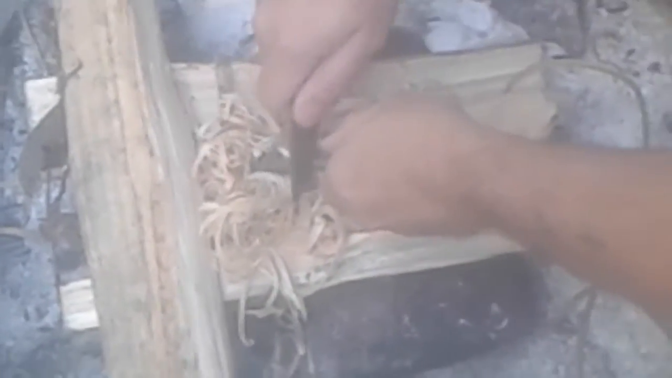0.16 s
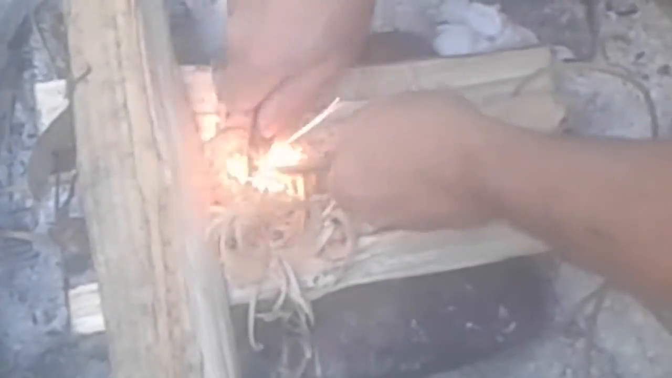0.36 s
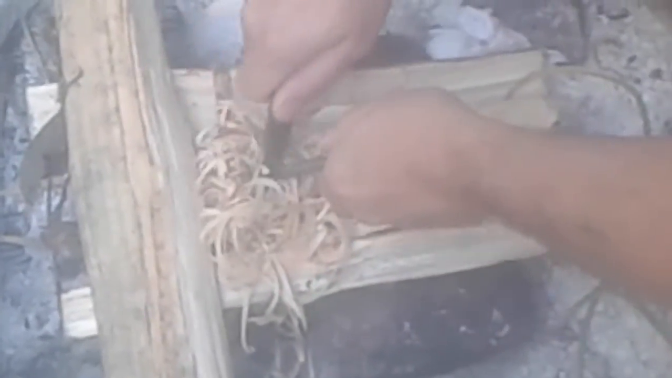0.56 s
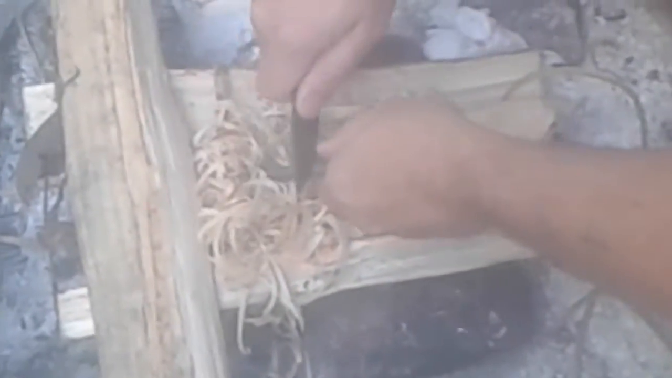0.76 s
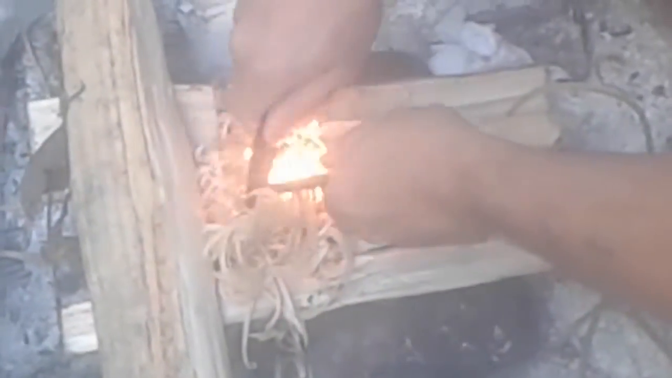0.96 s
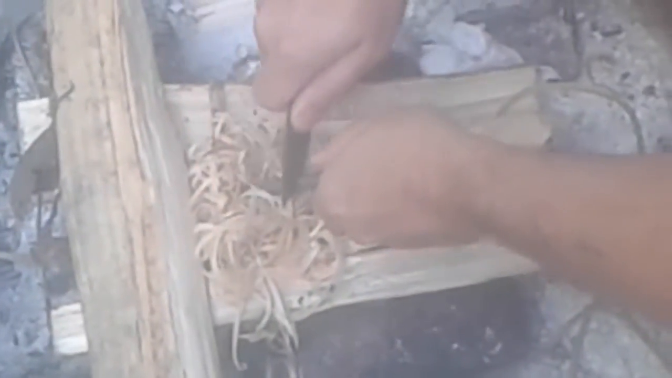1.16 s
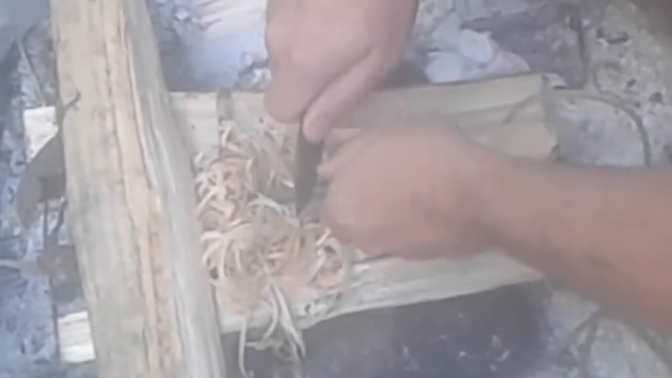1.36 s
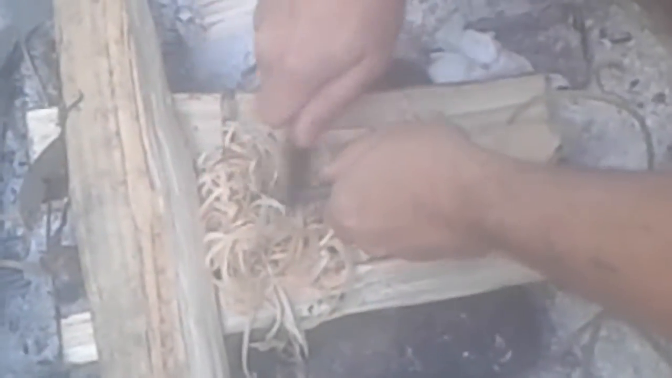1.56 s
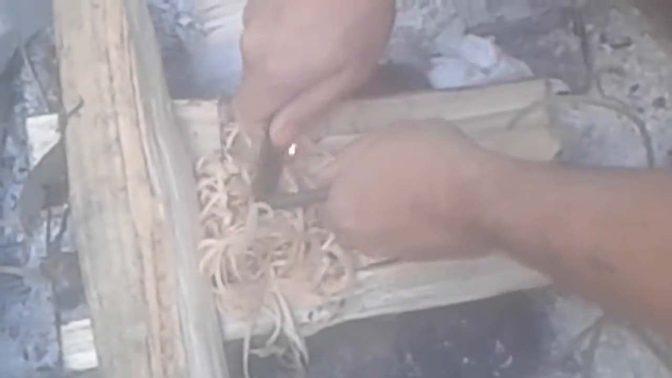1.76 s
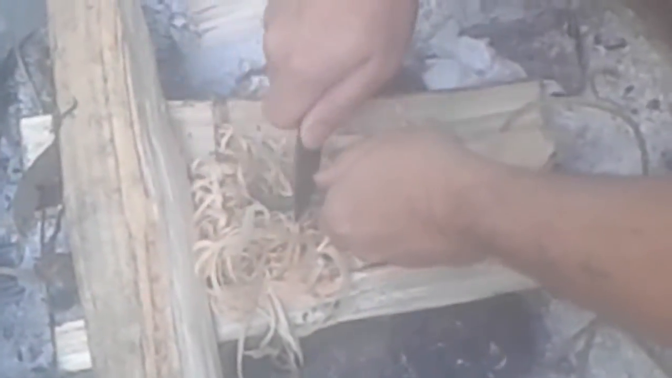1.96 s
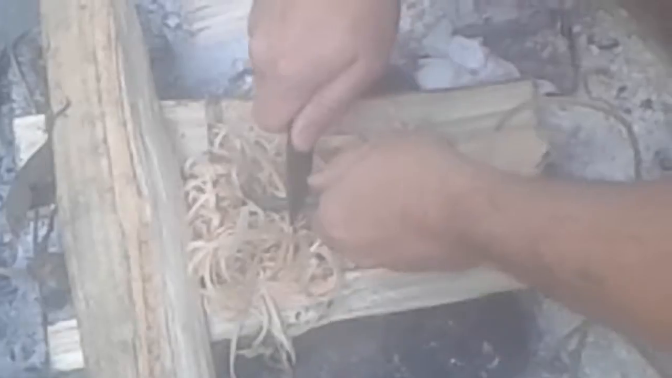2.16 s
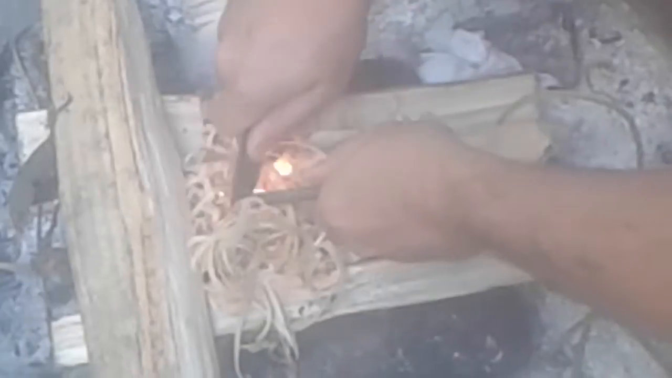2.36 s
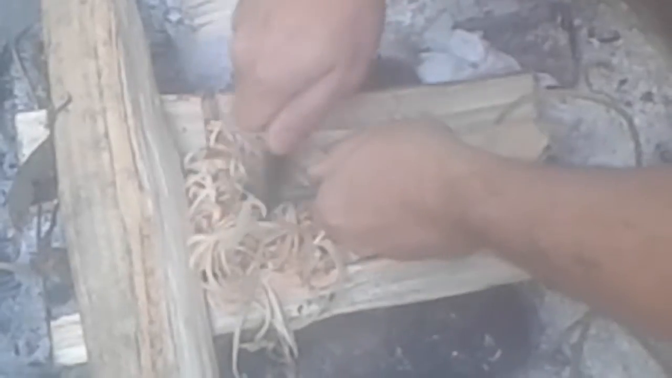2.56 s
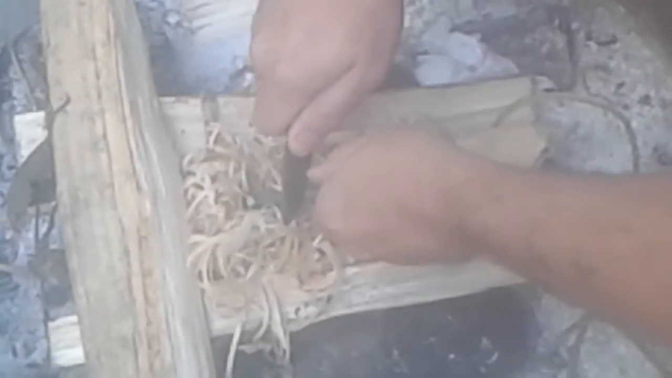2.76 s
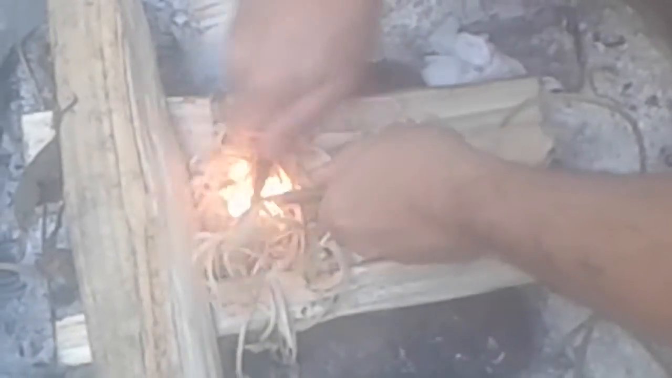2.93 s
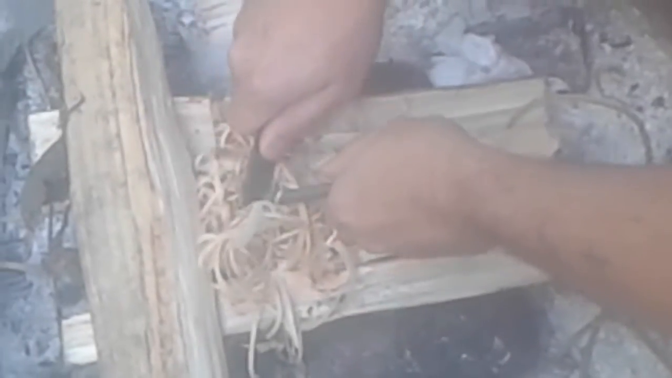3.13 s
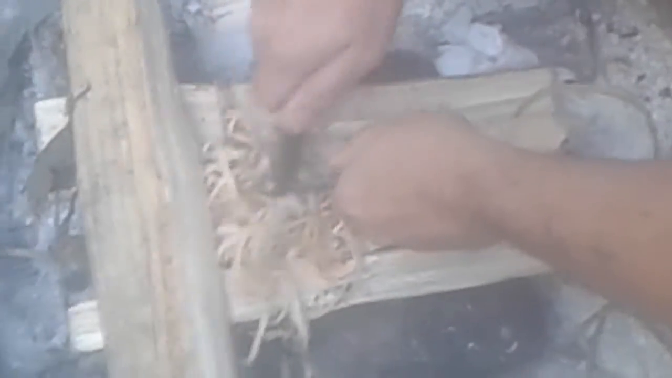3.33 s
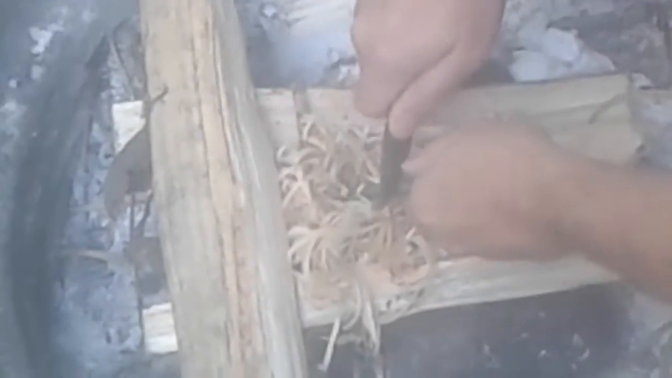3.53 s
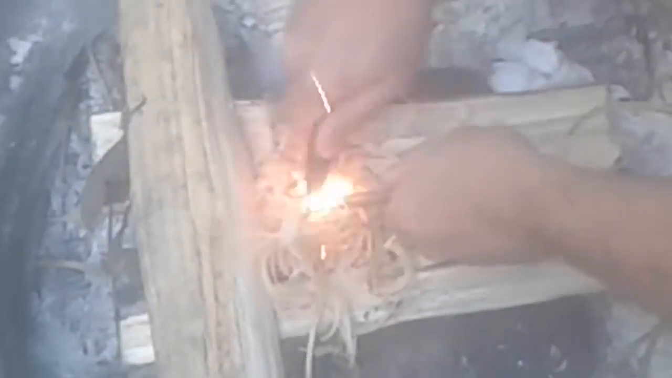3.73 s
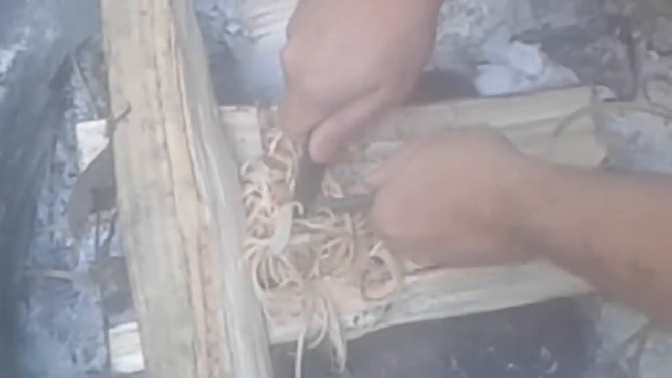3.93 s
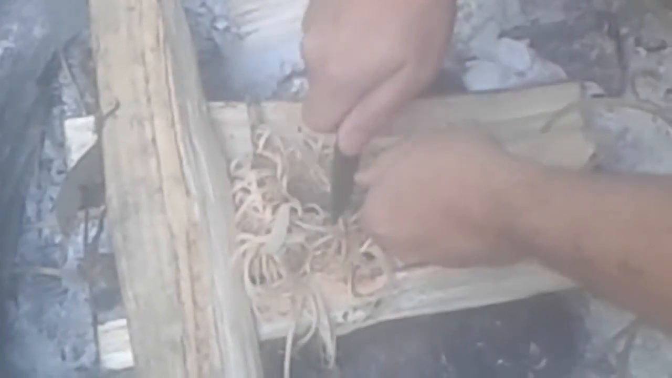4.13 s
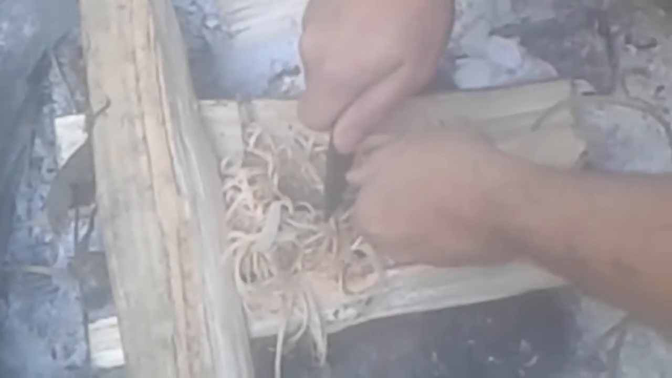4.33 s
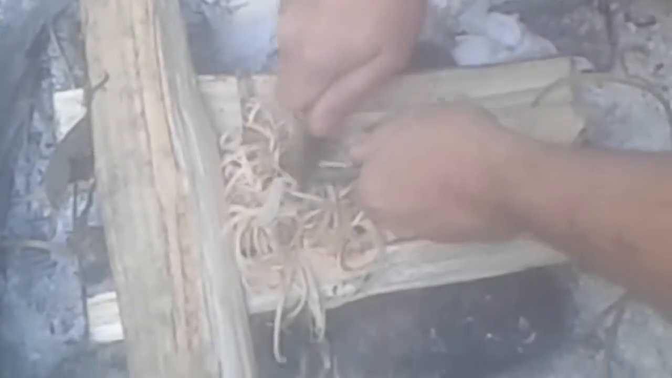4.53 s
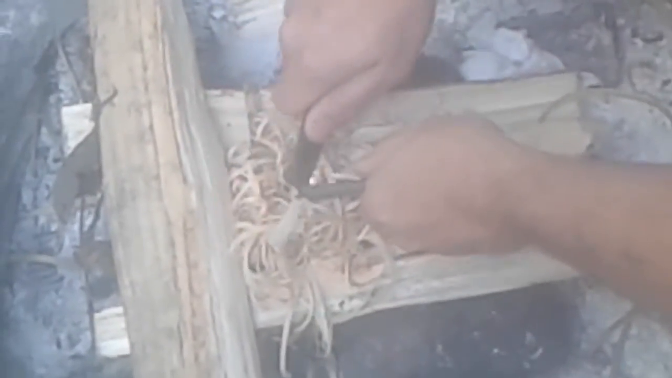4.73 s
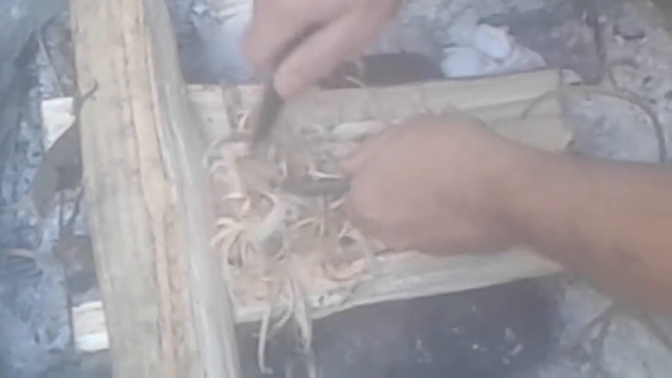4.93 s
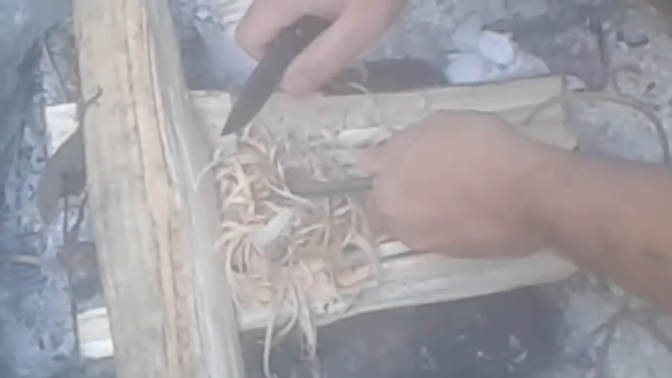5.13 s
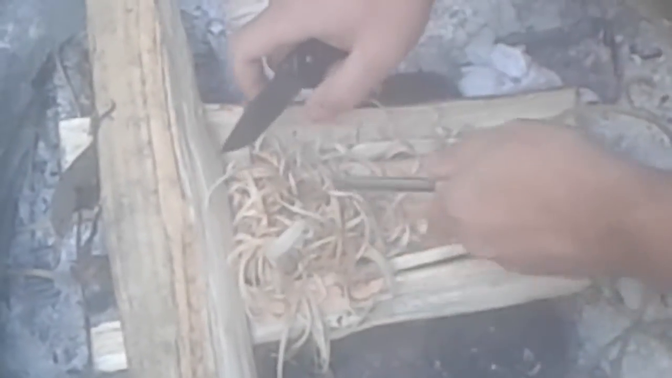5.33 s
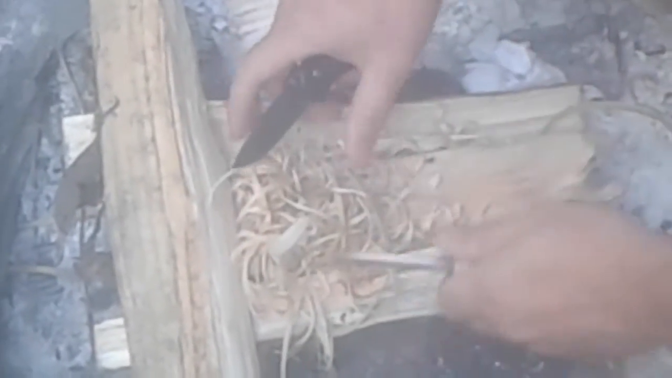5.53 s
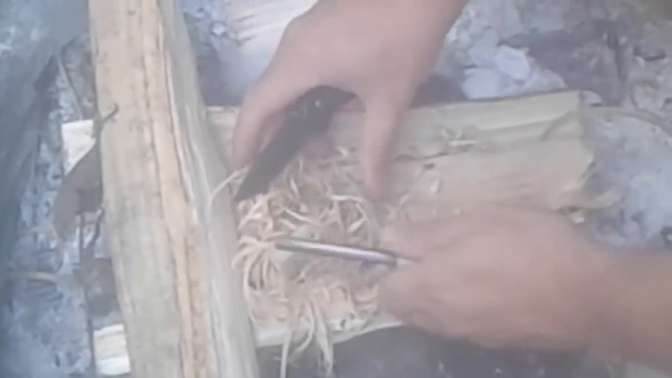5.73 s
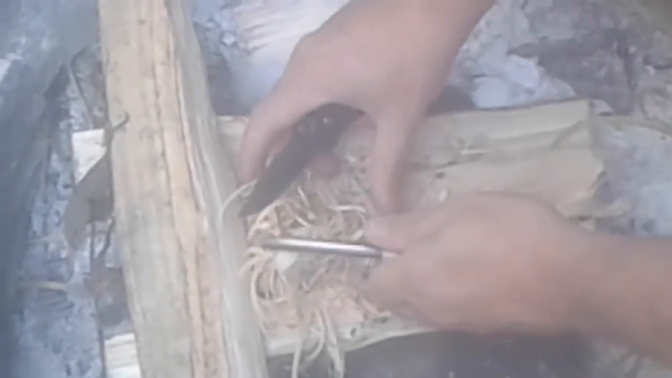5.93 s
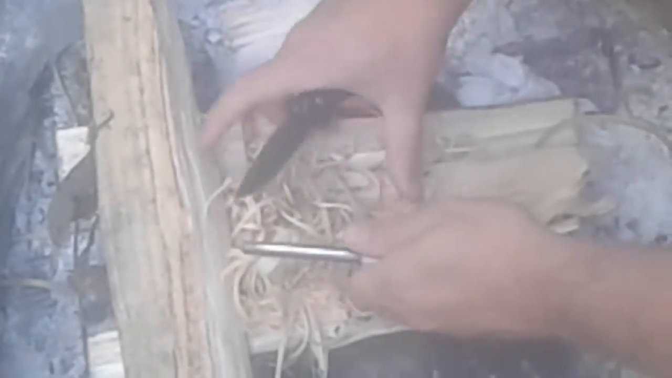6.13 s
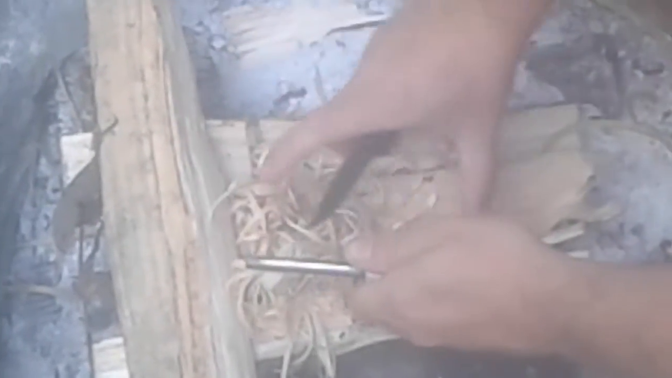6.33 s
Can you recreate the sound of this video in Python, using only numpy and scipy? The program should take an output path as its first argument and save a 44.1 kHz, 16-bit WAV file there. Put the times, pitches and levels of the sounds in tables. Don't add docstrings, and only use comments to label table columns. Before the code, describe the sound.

A close stereo microphone outdoors catches a low wind bump, then a knife tapping lightly onto a metal rod braced on wood. Seven short, harsh rasps follow, roughly two thirds of a second apart, each climbing slightly in pitch and ending abruptly. Small clicks, faint rubs and rustling wood shavings fill the gaps, over quiet rumble and leafy, insect-like hiss.

```python
import sys
import numpy as np
from scipy import signal
from scipy.io import wavfile

SR = 44100
rng = np.random.default_rng(int(sys.argv[2]) if len(sys.argv) > 2 else 0)


def file_out(sig):
    cols = np.atleast_2d(sig).T
    lim = np.clip(cols, -1, 1)
    pcm = np.round(lim * 32767).astype(np.int16)
    wavfile.write(sys.argv[1], SR, pcm)


def invert_db(level):
    return 10 ** (np.asarray(level, dtype=float) / 20)


N = 281740

# (frequency [Hz], density [dB per Hz])
WIND_SPECTRUM = [(12, -49), (20, -21), (22, -42), (66, 1.5), (92, 7), (122, 1.5), (193, -11), (400, -31),
                 (520, -17), (880, -120)]
RUMBLE_SPECTRUM = [(71, -29), (120, -4.5), (227, -5.5), (269, -8.5), (464, -8.5), (545, -13), (771, -8),
                   (1900, -24), (2470, -57), (4180, -120)]
HISS_SPECTRUM = [(760, -31), (1300, -1), (1810, -5.5), (2410, -4), (3190, 1.5), (3430, -10), (4230, 0.5),
                 (4930, -1), (7150, -10.5), (8410, -12.5), (13400, -17), (14500, -17)]
# (frequency [Hz], correlation [-1 to 1])
AIR_LIKENESS = [(60, 0.52), (130, 0.8), (290, 0.7), (640, 0.54), (1410, -0.56), (3100, 0.16),
                (6820, -0.052), (15000, -0.055)]
# (frequency [Hz], left minus right [dB])
AIR_BALANCE = [(60, 3.5), (110, 1.5), (200, 2.5), (380, 2.5), (700, 5.5), (1290, 3), (2380, 6.5), (4400, 7),
               (8120, -3), (15000, 4.5)]
# (time [s], level [dB])
GUSTS = [(0, -35.5), (.07, -51.5), (.2, -52.5), (.35, -51), (.5, -52.5), (.7, -62), (.85, -60), (1.3, -60),
         (1.9, -58.5), (2.6, -61.5), (2.75, -55.5), (3.19, -53.5), (3.27, -58), (4.2, -59.5), (5.2, -57),
         (5.7, -65), (6.1, -63), (6.22, -56.5)]
# (time [s], level re calm [dB])
BACKGROUND_SWELLS = [(0, 6), (.5, 1.5), (1.5, 2), (2.2, -1.5), (2.95, 3.5), (3.3, 1.9), (4.8, 0), (5.2, 2),
                     (5.7, -0.5), (6.15, 0.8), (6.39, 0)]
# (delay [s], level [dB])
ECHOES = [(.0062, -17.5), (0.0107, -24), (0.0172, -47)]

# (frequency [Hz], width [Hz], left [dB], right [dB], left-right likeness [0 to 1],
# extra early in a stroke [dB], extra late [dB])
WOOD_MODES = [(624, 410, 4.4, 2, 0.74, -5.5, -1), (1212, 570, 0.5, -3, 0.32, -12.5, 7),
              (292, 480, 5.4, 2, 0.87, -14.5, -3.5)]
BLADE_MODES = [(2044, 437, -1.5, 2.2, 0.81, 1.5, 2.5), (2460, 330, 8.5, 0.023, 0.48, 4, 1.8),
               (3270, 740, -1.5, 0.28, 0.14, -2, 0.38)]
ROD_MODES = [(4060, 640, -9.5, 0, 0.98, -1.5, 1.5), (4580, 380, 2.5, 3.5, 0.073, -19, -2),
             (5202, 550, -10.5, 1, 0.16, 7, 0.5), (6150, 1040, -14.5, -5.5, 0.051, -4, -3.5),
             (7220, 1400, -10.5, -10, 0.41, -2.5, 0.5), (8470, 920, -8, -9, 0.32, 4, 5),
             (9820, 1350, -22.5, -13.5, 0.17, 2.5, 1.5), (11440, 2200, -18.5, -17, 0.18, -6.5, 1.5),
             (14030, 1300, -21, -17.5, 0.18, 7, -1)]
# (start [s], end [s], from [Hz], to [Hz], level re wood [dB])
STROKES = [
    (0.799, 0.834, 497, 736, 3),
    (1.321, 1.387, 590, 870, -6),
    (2.057, 2.109, 560, 864, -5.5),
    (2.712, 2.786, 557, 905, -3),
    (3.414, 3.472, 490, 880, 1.5),
    (4.175, 4.223, 567, 1060, -2.5),
    (5.014, 5.08, 546, 726, -3.5),
]
# (bite [s], bite level [dB], climb [s], full level [dB], letting go [s])
PRESSES = [
    (0.784, -49, 0.036, -37.5, 0.089),
    (1.331, -42, 0.043, -36.5, 0.099),
    (2.046, -45.5, .052, -32.5, 0.052),
    (2.726, -43.5, 0.054, -34.5, 0.059),
    (3.409, -53.5, 0.042, -34.5, 0.057),
    (4.174, -44, 0.039, -34, 0.075),
    (5.006, -47.5, 0.058, -32.5, 0.043),
]
# (time [s], rise [s], fall [s], blade level [dB], rod re blade [dB])
RUBS = [(0.507, 0.041, 0.055, -52.5, 2), (0.95, 0.047, 0.45, -56.5, 1.5), (1.16, 0.014, 0.031, -51, -8),
        (1.48, .05, .03, -52, 5.5), (1.544, 0.024, 0.13, -49, 4.5), (1.678, 0.022, 0.047, -55, 5.5),
        (1.72, 0.056, 0.017, -50, -10), (2.165, 0.014, 0.093, -44, 2), (2.297, 0.081, 0.034, -53, -0.5),
        (2.87, .04, 0.9, -55.5, 1), (3.04, 0.5, 0.089, -54.5, -11.5), (3.149, 0.1, 0.018, -47, -1),
        (3.772, .06, 0.17, -56.5, 3.5), (3.87, 0.12, 0.057, -60, -4), (3.955, 0.21, 0.044, -47.5, -6),
        (4.304, 0.026, 0.048, -49.5, -6), (4.33, 0.024, 0.54, -60.5, 0), (4.68, .02, .012, -61, -12),
        (5.12, .01, 0.31, -54, 3), (5.225, 0.026, 0.042, -48, 0), (5.27, 0.1, 0.012, -54, -3),
        (5.44, .15, .03, -63, 5.5), (6.362, 0.11, .03, -64, 6)]

# (frequency [Hz], left [dB], right [dB], t60 after contact [ms])
TAP_WOOD_MODES = [(620, -17, -18, 5), (1065, -20, -21, 50)]
TAP_SPINE_MODES = [(2164, -7.5, -9, 4.7), (3310, -16, -8.5, 2.8), (4010, -13, 2, 1.4), (4070, -10, -16, 4),
                   (5205, 3, -3.5, 1.4)]
# (time [s], peak level [dB], blade frequency [Hz], brightness [dB])
SET_BACKS = [
    (0.4651, -27.5, 3110, 9),
    (1.1444, -19, 2290, -0.5),
    (1.668, -30, 2270, -2),
    (2.4688, -19, 2286, 0),
    (3.1106, -25, 2280, .7),
    (3.8909, -24.5, 2320, -2),
    (4.6364, -22, 2370, 4),
]
# (time [s], peak level [dB], blade frequency [Hz], brightness [dB])
SNAGS = [(0.815, -29, 2480, 3), (0.8264, -45, 2080, 23), (1.334, -33, 2220, 14.5), (2.1001, -14, 2390, 0.5),
         (2.1056, -26, 1920, 11), (2.7938, -25.5, 2600, -5), (2.8034, -30, 1950, -5),
         (3.4589, -21, 2120, -2), (3.4652, -18, 2464, -0.5), (4.2219, -15, 2310, -7),
         (4.2264, -21, 2260, -14), (4.277, -39, 2470, 9), (4.2968, -30.5, 2340, 6)]
# (time [s], peak level [dB], blade frequency [Hz], brightness [dB])
TICKS = [(0.9094, -44.5, 2000, 6), (1.538, -36, 2720, 10), (2.2107, -46, 2380, 12),
         (2.2262, -49.5, 2480, 13), (2.267, -57, 2380, 15), (2.2938, -39.5, 2460, -16),
         (2.319, -49, 2440, 10.5), (2.953, -42, 2380, 0.5), (3.1542, -34.5, 2320, -21),
         (3.666, -48.5, 2440, 2), (3.714, -54, 2470, 9), (3.7604, -46, 2270, 5.5), (4.6787, -48.5, 2320, 0),
         (5.133, -33.5, 2430, 2.5), (5.187, -43.5, 2600, 7), (5.236, -31.5, 2580, -8),
         (5.2433, -31, 2410, -22), (5.26, -47.5, 2560, -23), (5.3835, -48, 2440, 4)]
# (spine re blade [dB], rod re blade [dB], contact [ms])
TAP_KINDS = [
    (-7, -9.5, 3.38),
    (-11, -9, 3.97),
    (-8, -1.7, 4.35),
]


def rms_one(x):
    return x / np.sqrt(np.mean(x ** 2) + 1e-20)


def at_hz(points, hz):
    table = np.array(points)
    return np.interp(np.log(hz), np.log(table[:, 0] + 1e-9), table[:, 1])


def drift(rate_hz):
    r = np.exp(-64 * np.pi * rate_hz / SR)
    slow = signal.lfilter([1], [1, -2 * r, r * r], rng.standard_normal(N // 32 + 2002))
    slow = slow[2000:]
    return np.interp(np.arange(N) / 32, np.arange(len(slow)), rms_one(slow - slow.mean()))


def banded_noise(spectrum, patchy_db, speed_hz):
    out, white = 0, rng.standard_normal((2, 2, N))
    lowest, highest = spectrum[0][0], spectrum[-1][0]
    edges = np.geomspace(lowest, highest, 1 + round(3 * np.log2(highest / lowest)))
    together = drift(speed_hz)
    for k, (low, high) in enumerate(zip(edges, edges[1:])):
        band = signal.butter(2, [low, high], "band", fs=SR, output="sos")
        mid, side = signal.sosfilt(band, white[k % 2])
        hz = np.sqrt(low * high)
        alike = np.clip(at_hz(AIR_LIKENESS, hz), -1, 1)
        tilt_db = at_hz(AIR_BALANCE, hz) / 2
        flicker = 1.23 * together + 0.66 * drift(speed_hz)
        gain = invert_db(at_hz(spectrum, hz) + patchy_db * flicker)
        pair = np.sqrt(1 + alike) * mid + np.sqrt(1 - alike) * side * [[1], [-1]]
        out = out + gain * invert_db(np.array([[tilt_db], [-tilt_db]])) * pair
    return out / np.sqrt(np.mean(out.mean(axis=0) ** 2))


def wind():
    gust_db = np.interp(np.arange(N) / SR, *np.transpose(GUSTS))
    return invert_db(gust_db) * banded_noise(WIND_SPECTRUM, patchy_db=2.5, speed_hz=25.2)


def rumble(background_db):
    return invert_db(-60.5 + background_db) * banded_noise(RUMBLE_SPECTRUM, patchy_db=1.0, speed_hz=8)


def leaves_and_insects(background_db):
    return invert_db(-61.5 + background_db) * banded_noise(HISS_SPECTRUM, patchy_db=0.29, speed_hz=30)


def air():
    background_db = np.interp(np.arange(N) / SR, *np.transpose(BACKGROUND_SWELLS))
    return wind() + rumble(background_db) + leaves_and_insects(background_db)


def surroundings(x):
    dull, out = signal.lfilter([.5], [1, -.5], x[::-1]), x.copy()
    for delay_s, level_db in ECHOES:
        lag = round(delay_s * SR)
        out[:, lag:] += invert_db(level_db) * dull[:, :-lag]
    left_lag = 3
    return np.array([np.roll(out[0], left_lag), out[1]])


def body(modes, force, early, late):
    out, power = np.zeros((2, N)), 0
    for k, (hz, width_hz, left_db, right_db, alike, early_db, late_db) in enumerate(modes):
        r, alike = np.exp(-np.pi * width_hz / SR), np.clip(alike, 0, 1)
        b = (1 - r * r) / 2 * np.array([1, 0, -1])
        a = [1, -2 * r * np.cos(2 * np.pi * hz / SR), r * r]
        grip = invert_db(early_db * early + late_db * late + 2 * drift(35.0))
        near, other = signal.lfilter(np.convolve(b, b), np.convolve(a, a), force * grip + 1e-18)
        blend = alike * near + np.sqrt(1 - alike ** 2) * other
        out += (-1) ** k * np.array([invert_db(left_db) * near, invert_db(right_db) * blend])
        power += (invert_db(left_db) ** 2 + invert_db(right_db) ** 2) / 4 * np.pi * width_hz / SR
    return out / np.sqrt(power)


def bending(force):
    start, end, from_hz, to_hz, level_db = np.transpose(STROKES)
    t, ends = np.arange(N) / SR, np.ravel([start, end], "F")
    hz = np.interp(t, ends, np.ravel([from_hz, to_hz], "F"))
    gain = invert_db(np.interp(t, ends, np.repeat(level_db, 2)))
    turn = np.exp(2j * np.pi * np.cumsum(hz) / SR)
    r = np.exp(-np.pi * 80 / SR)
    damped = signal.lfilter([np.sqrt(2 - 2 * r * r)], [1, -r], force / turn)
    return gain * np.real(turn * damped) * invert_db(np.array([[1.2], [-1.2]]))


def taps():
    tones, rod_force = np.zeros((2, N)), np.zeros(N)
    t = np.arange(round(.06 * SR)) / SR
    rows = []
    for table, (spine_db, rod_db, contact_ms) in zip((SET_BACKS, SNAGS, TICKS), TAP_KINDS):
        for s, db, hz, bright_db in table:
            rows.append((s, db, hz, spine_db + bright_db, rod_db + bright_db, contact_ms))
    chances = rng.random(size=(48, 8, 4))
    for (s, blade_db, blade_hz, spine_db, rod_db, contact_ms), luck in zip(rows, chances):
        at, contact = round(s * SR), max(contact_ms, .5) / 1000
        modes = [(blade_hz, 0.5, -5, 5.4), *TAP_WOOD_MODES]
        modes += [(hz, l + spine_db, r + spine_db, ring) for hz, l, r, ring in TAP_SPINE_MODES]
        for (hz, left_db, right_db, t60_ms), (start, skew, detune, hold) in zip(modes, luck):
            held = contact * (1 - .5 * hold * (hz > 3000))
            choke_db = -60000 * np.maximum(t - held, 0) / t60_ms
            swell = np.sin(2.3 * np.minimum(t / held, 1)) * invert_db(choke_db)
            bearing = np.minimum(t, held)
            sag = 0.15 * (hz > 1500) * (bearing / 2 - bearing ** 2 / held / 2)
            side_phase = np.array([[0], [(skew - .5) * hz / 12000]])
            cycles = hz * ((1 + .03 * (detune - .5)) * t + sag) + start + side_phase
            sides = invert_db(blade_db + np.array([[left_db], [right_db]]))
            tones[:, at:at + len(t)] += sides * swell * np.sin(2 * np.pi * cycles)
        push = invert_db(blade_db + rod_db - 0.5 - 7 * t / contact)
        rod_force[at:at + len(t)] += push * np.minimum(t / 0.00019, 1) * (t < contact)
    return tones, rod_force


def pressure():
    t, power = np.arange(N) / SR, 0
    bite_s, bite_db, let_go_db, lift_db = 0.0066, 13, 16.5, 19
    wood_db, rod_shares_db = (-3, -6.5, -3.5), (4, 5, 7)
    for s, start_db, climb_s, full_db, go_s in PRESSES:
        marks = s + np.cumsum([0, climb_s, go_s])
        clear = marks[2] + go_s
        eased_db = full_db - let_go_db
        levels_db = [start_db - bite_db, start_db, full_db, eased_db, eased_db - lift_db]
        blade_db = np.interp(t, [s - bite_s, *marks, clear], levels_db)
        shares_db = np.array([np.interp(t, marks, wood_db), 0 * t, np.interp(t, marks, rod_shares_db)])
        power = power + invert_db(2 * (blade_db + shares_db)) * ((t > s - bite_s) & (t < clear))
    broken_db = 1.2 * drift(38)
    for s, rise_s, fall_s, blade_db, rod_db in RUBS:
        fade_db = 19.5 * np.maximum((s - t) / rise_s, (t - s) / fall_s)
        shares_db = np.array([[-6 + 0.49 * rod_db], [0], [rod_db]])
        power = power + invert_db(2 * (blade_db + shares_db)) * invert_db(2 * (broken_db - fade_db))
    return np.sqrt(power)


def knife():
    t, drag = np.arange(N) / SR, pressure()
    early = sum(np.interp(t, [start - .01, start, end], [0, 1, 0]) for start, end, *_ in STROKES)
    late = sum(np.interp(t, [start, end, end + .015], [0, 1, 0]) for start, end, *_ in STROKES)
    slips_per_s, spread_db, chatter_db = 9000, 3.0, 1.5
    sizes = invert_db(spread_db * np.minimum(rng.exponential(1, N), 4))
    sizes = sizes * (rng.random(N) < slips_per_s / SR)
    slips = rms_one(sizes * invert_db(chatter_db * drift(46)) * rng.choice([-1, 1], (2, N)))
    tones, rod_force = taps()
    wood, blade, rod = drag[:, None] * slips
    upper = signal.butter(3, 5300, "high", fs=SR, output="sos")
    rod = rod + signal.sosfilt(upper, rod_force * rng.choice([-1, 1], (2, N)))
    ringing = body(WOOD_MODES, wood, early, late)
    ringing = ringing + body(BLADE_MODES, blade, early, late) + body(ROD_MODES, rod, early, late)
    return ringing + bending(wood[0] * (early + late)) + tones


def scene():
    return surroundings(knife()) + air()


def roll_off(x):
    return signal.sosfilt(signal.butter(12, 15890, fs=SR, output="sos"), x)


def record(dry):
    low_pass = signal.cheby2(12, 40, 15000, fs=SR, output="sos")
    mix = signal.sosfilt(low_pass, dry)
    return roll_off(mix)


dry = scene()
out = record(dry)
file_out(out)
```